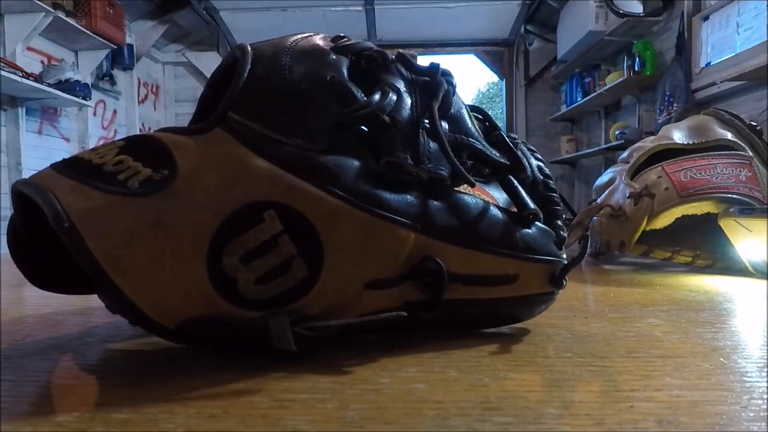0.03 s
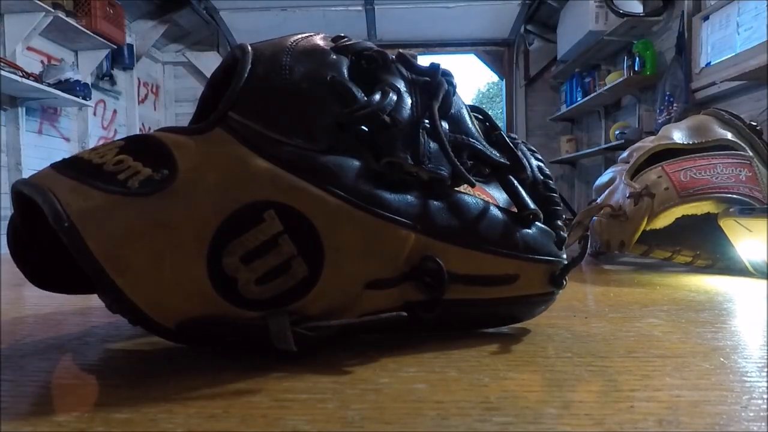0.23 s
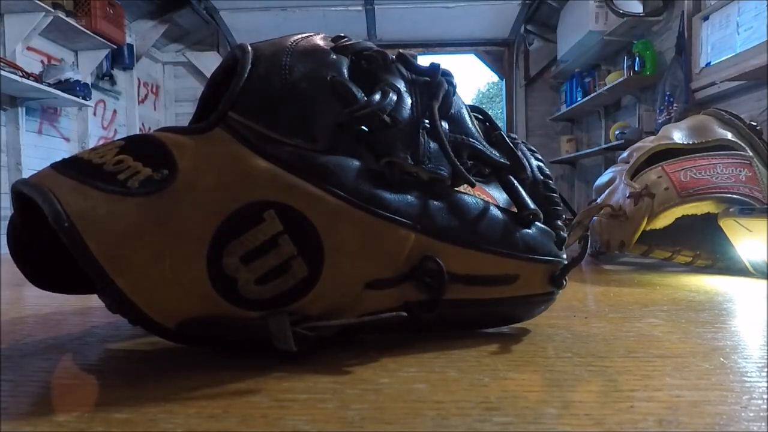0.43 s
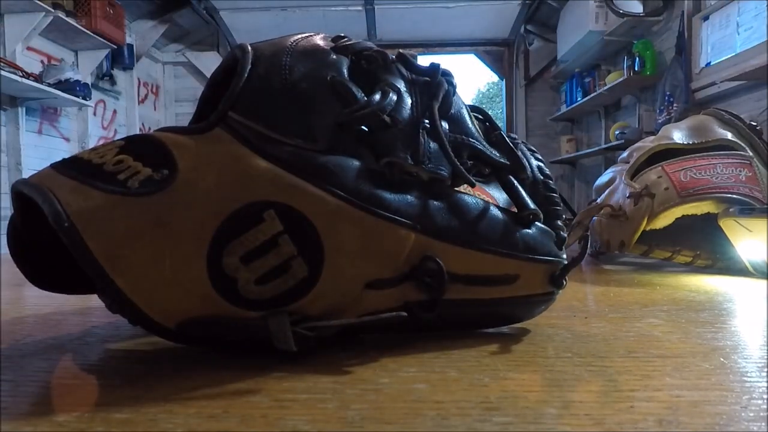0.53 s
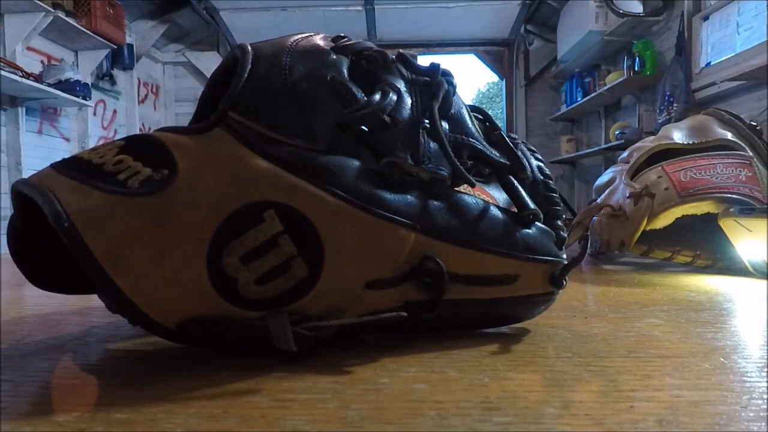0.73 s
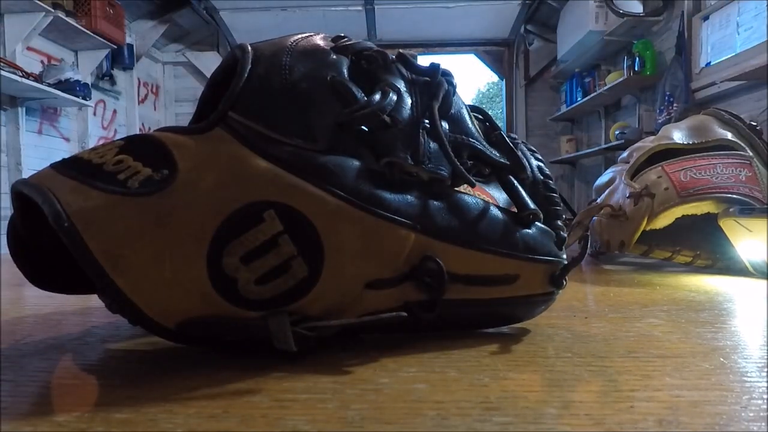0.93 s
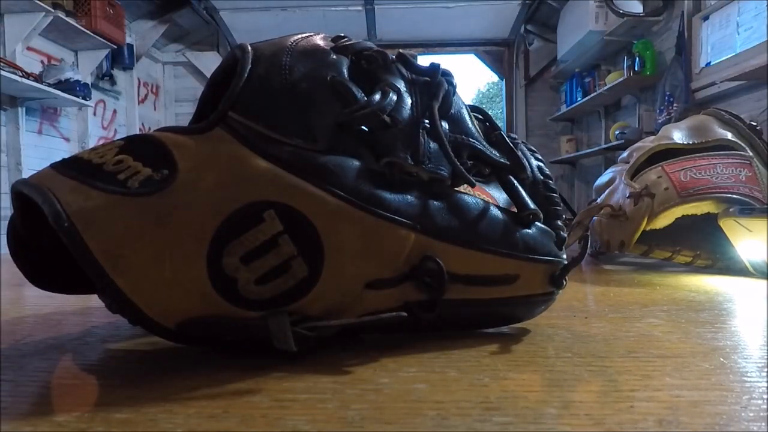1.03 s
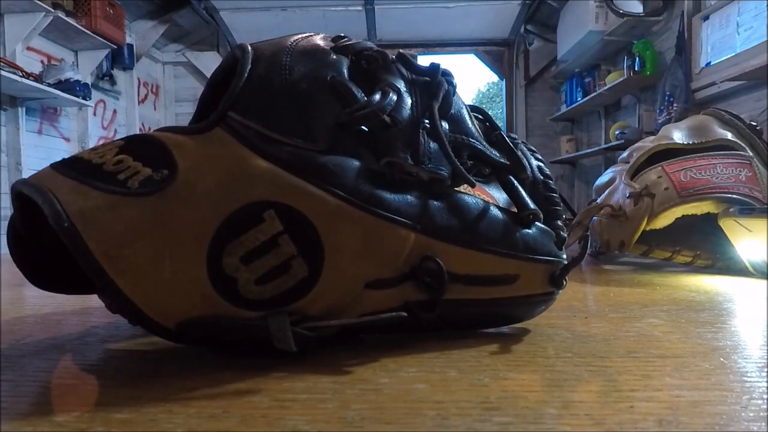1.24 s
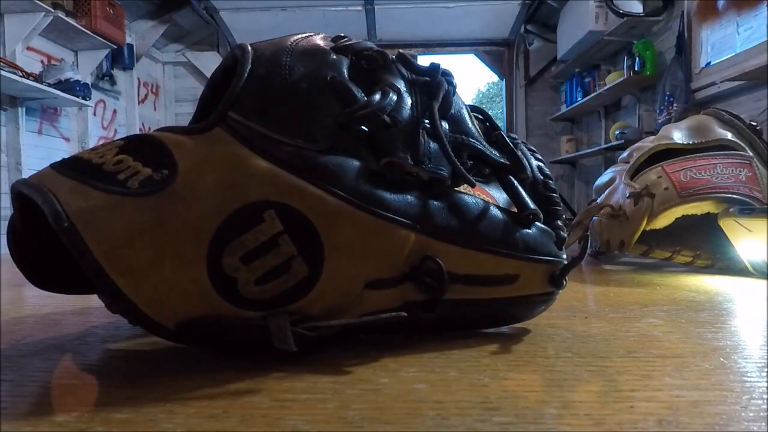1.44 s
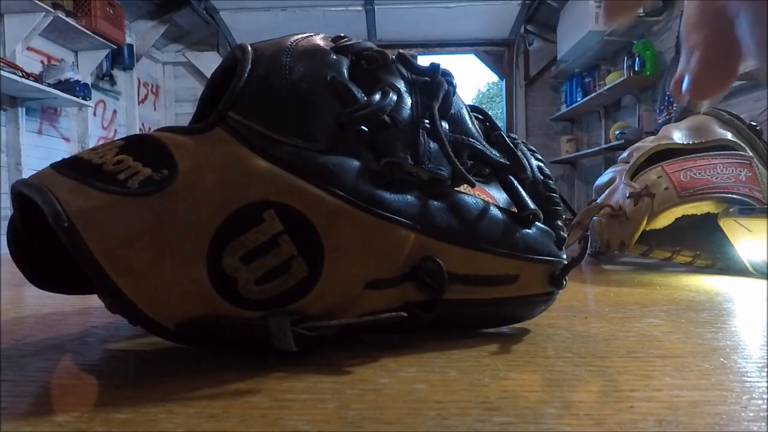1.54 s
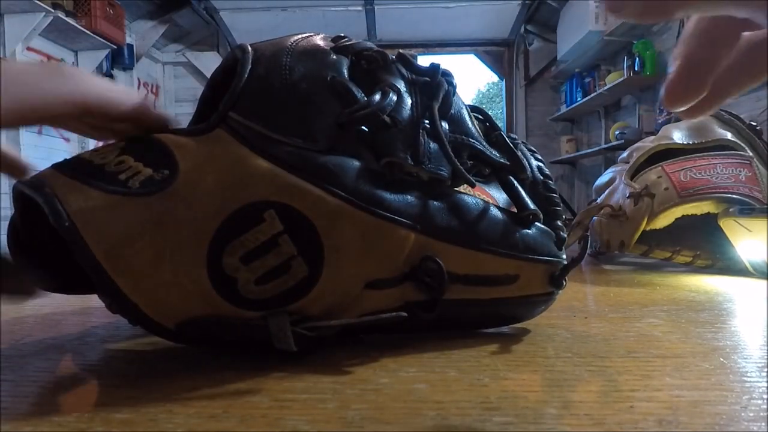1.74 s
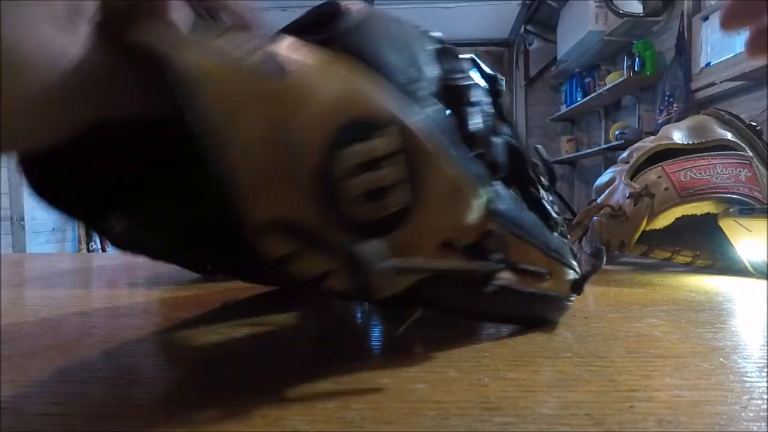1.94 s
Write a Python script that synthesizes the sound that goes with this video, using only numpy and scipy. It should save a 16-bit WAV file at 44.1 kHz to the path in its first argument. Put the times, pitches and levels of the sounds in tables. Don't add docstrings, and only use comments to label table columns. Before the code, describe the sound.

A leather glove thumps on a wooden table, heard close in stereo. From 0.06 to 0.3 seconds uneven knocks make the wood ring low, with cloth rustle and a deep wobble. Until 1.45, quiet swishes and tiny leather ticks sit over garage hiss and hum. At 1.46 a hard, short thump with a bounce ducks the noise; it recovers while faint finger taps sound from 1.7 to 2.

```python
import sys
import numpy as np
from scipy import signal
from scipy.fft import rfft, irfft
from scipy.io import wavfile
from scipy.ndimage import uniform_filter1d, minimum_filter1d

SR = 44100
rng = np.random.default_rng(int(sys.argv[2]) if len(sys.argv) > 2 else 0)


def unload_audio(sound):
    columns = np.transpose(np.atleast_2d(sound))
    steps = np.round(np.clip(columns, -1, 1) * 32767)
    wavfile.write(sys.argv[1], SR, steps.astype(np.int16))


def voltage_ratio(decibels):
    exponent = np.asarray(decibels, float) / 20
    return 10 ** exponent


N = 88200

# (frequency [Hz], level [dB per Hz])
NOISE_MIDDLE = [(30, -33), (105, -56), (150, -6), (380, -15), (1000, -22.5), (3500, -32), (9500, -35),
                (15200, -48)]
# (frequency [Hz], level [dB per Hz])
NOISE_SIDE = [(40, -29), (105, -31), (150, 0.5), (400, -7), (650, -1), (4000, -29), (9500, -26.5),
              (15200, -43)]
# (frequency [Hz], width [Hz], level [dB], left over right [dB])
HUMS = [
    (78.7, 19, -65.5, 1),
    (147.2, 12, -67.5, 10),
    (204, 35, -75.5, 37),
    (5380, 140, -83, 26.5),
]
# (time [s], middle level [dB], side level [dB])
AUTO_GAIN = [
    (0, -1.5, 5),
    (1.465, -2.5, 4.5),
    (1.48, -39, -18),
    (1.53, -16, -3.5),
    (1.62, -6.5, 1),
    (1.719, -8.5, -6.5),
    (1.85, -5, -3),
    (2, -3.5, -12),
]
# (time [s], level [dB])
STAND_SHOVES = [(.0, -43.5), (0.094, -31), (.19, -59), (0.3, -38), (0.38, -36.5), (0.498, -53),
                (0.597, -49), (0.761, -61), (1.46, -58), (1.59, -53.5), (1.84, -56)]
# (loudest time [s], level [dB], rise [s], fall [s], centre frequency [Hz])
RUSTLES = [(.8, -60, .1, 0.11, 79), (1.605, -47, 0.021, .02, 50), (1.86, -55, .03, .06, 66),
           (1.66, -48.5, 0.019, .03, 233), (.01, -54, .02, 0.019, 214), (.03, -51.5, 0.032, 0.12, 81),
           (.60, -61, 0.028, .03, 6000), (.79, -60, 0.018, 0.024, 6230), (0.836, -54.5, 0.025, 0.036, 5400),
           (1.05, -50.5, 0.014, 0.027, 5500), (1.114, -51.5, 0.0027, 0.022, 5430),
           (1.40, -63, 0.033, 0.07, 2470)]
# (time [s], level [dB], centre frequency [Hz], length [s], left over right [dB])
TICKS = [(0.116, -53, 900, 0.02, 0), (0.15, -50, 1000, 0.03, 1), (0.189, -45.5, 1100, 0.015, 4),
         (.193, -46, 2060, 0.0046, 8), (.194, -51, 6000, 0.0035, 1), (.251, -55, 1800, .004, 3),
         (.285, -56, 1900, .005, 3), (0.388, -52, 6170, 0.0018, -3), (0.553, -47, 4940, 0.0015, 9),
         (.5532, -53, 7500, .001, 9), (.5617, -43, 7400, 0.001, 12), (0.5625, -47, 4900, 0.002, 9),
         (1.328, -59, 5400, .02, 4), (1.4643, -22, 1400, 0.0035, 1), (1.4646, -23, 2200, .002, 0),
         (1.465, -27, 3200, .002, 0.5), (1.4656, -39, 5200, .002, 6), (1.471, -43, 1574, 0.063, 7),
         (1.494, -35, 1250, 0.003, 3.5), (1.495, -47, 2530, 0.0042, -6), (1.603, -59, 3200, 0.0021, -7),
         (1.767, -53, 1110, 0.018, 9), (1.822, -54.5, 1610, 0.031, 4), (1.846, -48, 3700, 0.003, 1),
         (1.847, -53, 5500, .002, 1), (1.904, -58, 1780, 0.0055, 2), (1.939, -52, 2440, 0.001, -2),
         (1.993, -52, 4540, 0.0039, 0), (1.994, -47, 8000, 0.0027, 0)]
# (time [s], level [dB], frequency [Hz], time to fall 60 dB [s])
KNOCKS = [(.09, -36, 125, .12), (.113, -32, 700, .01), (.149, -12, 220, .02), (.1505, -10, 480, .012),
          (.160, -22, 930, .04), (.166, -14, 500, .012), (.1945, -4, 200, .03), (.195, -20, 950, .012),
          (.2, -23, 112, .22), (.246, -25, 112, .2), (.257, -24, 450, .015), (1.4648, -9, 1050, .008),
          (1.4655, -6, 640, .01), (1.4658, -7, 240, .025), (1.4664, -1, 500, .014), (1.4955, -8, 200, .04),
          (1.498, -20, 1000, .012)]
# (frequency [Hz], time to fall 60 dB [s],
#                        level when pressed [dB], when dropped [dB], under fingers [dB])
TABLE_MODES = [(61.2, 0.46, -21, -42, -19), (152.5, 0.27, -2.5, -2.5, 2.5), (179.9, 0.14, -1, 5.5, 4),
               (237.5, 0.23, -13.5, -0.5, -0.5), (287, 0.06, -4.5, 0, 7), (336.4, 0.076, 1, -2.5, 0),
               (396, 0.049, -30.5, -10.5, 6.5), (451.6, 0.096, 0, 5.5, 2), (504, 0.11, 4, 4.5, -4.5),
               (589.6, 0.14, -1, -6, -1), (666.4, 0.046, -1, 4.5, 4), (800, 0.032, -7.5, -4.5, 10),
               (910, 0.058, -8.5, 0.5, -3), (979, 0.016, 3.5, 3, 14)]
PRESSED, DROPPED, TAPPED = 2, 3, 4
# (time [s], level [dB], hardness [Hz])
PRESS = [(.062, -33, 880), (.072, -70, 890), (.082, -30, 880), (.092, -53, 840), (.102, -27, 910),
         (.113, -25, 1210), (.125, -62, 910), (.137, -16, 700), (.142, -14.5, 700), (.149, -6, 704),
         (.160, -16, 700), (.168, -8.5, 700), (.191, -9.5, 890), (.1925, -4, 280), (.215, -8, 292),
         (.244, -13.5, 473), (.257, -17.5, 530), (.272, -19.5, 316), (.33, -39.5, 298)]
# (time [s], level [dB], hardness [Hz])
DROP = [(1.453, -23, 648), (1.4635, -3, 1500), (1.473, -18.5, 292), (1.487, -12.5, 700), (1.496, -9.5, 595),
        (1.512, -28, 406), (1.536, -17, 474), (1.572, -20, 339), (1.588, -29, 585), (1.604, -37.5, 546)]
# (time [s], level [dB], hardness [Hz])
FINGERS = [(1.70, -44.5, 248), (1.785, -41, 252), (1.797, -38.5, 216), (1.808, -37, 265),
           (1.820, -48.5, 990), (1.837, -41.5, 860), (1.858, -41.5, 390), (1.884, -61, 300),
           (1.906, -53, 910), (1.937, -45, 540), (1.955, -45.5, 510), (1.979, -52, 810), (1.992, -35, 497)]
# (frequency [Hz], left over right [dB], right ahead [radians])
OPENINGS = [(40, 1.5, .1), (110, 3, 1.6), (180, 8, 1.4), (240, 9, 1.0), (335, 12, .6), (395, 7.5, 3.1),
            (470, 7, 3.1), (570, .5, 2.9), (790, -8, 3.0), (1000, -2, 3.5)]

NOISE_MIDDLE_DB, NOISE_SIDE_DB = -51, -54
HISS_HZ, HISS_BACK_S = 8950, 0.044
MOTOR_HZ, MOTOR_DB, MOTOR_PAN_DB = 385, -65.5, 16
WOBBLE_HZ, WOBBLE_RING_S = 33.54, 0.61
RUSTLE_PAN_DB, RUSTLE_OCTAVES = 4, 0.66
KNOCK_LOW_HZ = 95
TABLE_LOW_HZ, STRIKE_SPREAD_DB = 112, 2.5
TRAVEL_S = 0.0012
PRESS_DB, DROP_DB, FINGERS_DB = -3.5, -4, -2
ROOM_DB, ROOM_RING_S, ROOM_LOW_HZ, ROOM_HIGH_HZ = -10.5, 0.23, 700, 3070
LIMIT, LIMIT_S, TOP_HZ = .96, .012, 16600


def time():
    return np.arange(N) / SR


def rms_one(x):
    return x / np.sqrt(np.mean(x ** 2) + 1e-20)


def pan(db):
    return voltage_ratio(np.array([[db / 2], [-db / 2]]))


def high_pass(x, order, hz):
    return signal.sosfilt(signal.butter(order, hz, "high", fs=SR, output="sos"), x)


def band(x, hz, octaves):
    edges = np.clip(hz * 2. ** np.array([-octaves, octaves]), 20, .45 * SR)
    return signal.sosfilt(signal.butter(2, edges, "band", fs=SR, output="sos"), x)


def ring(x, hz, ring_s):
    shrink = voltage_ratio(-60 / (ring_s * SR))
    turn = 2 * np.pi * hz / SR
    return signal.lfilter([0, np.sin(turn)], [1, -2 * shrink * np.cos(turn), shrink ** 2], x + 1e-18)


def soft_push(length):
    push = np.hanning(length)
    return push / push.sum()


def coloured(spectrum):
    hz, db = np.transpose(spectrum)
    f = np.maximum(np.fft.rfftfreq(N, 1 / SR), 1)
    gain = voltage_ratio(np.interp(np.log(f), np.log(hz), db))
    return rms_one(irfft(rfft(rng.standard_normal(N)) * gain, N))


def background():
    s, middle_db, side_db = np.transpose(AUTO_GAIN)
    middle = voltage_ratio(np.interp(time(), s, middle_db))
    side = voltage_ratio(np.interp(time(), s, side_db))
    noise = voltage_ratio(NOISE_MIDDLE_DB) * middle * coloured(NOISE_MIDDLE)
    noise = noise + voltage_ratio(NOISE_SIDE_DB) * side * coloured(NOISE_SIDE) * [[1], [-1]]
    since_thump = time() - AUTO_GAIN[1][0]
    missing = (since_thump > 0) * np.exp(-np.maximum(since_thump, 0) / HISS_BACK_S)
    noise = noise - missing * high_pass(noise, 4, HISS_HZ)
    hums = 0
    for hz, width, db, pan_db in HUMS:
        hum = ring(rng.standard_normal(N), hz, 2.8 / width)
        hums = hums + pan(pan_db) * voltage_ratio(db) * rms_one(hum)
    motor = pan(MOTOR_PAN_DB) * voltage_ratio(MOTOR_DB) * side * np.sin(2 * np.pi * MOTOR_HZ * time())
    return noise + np.sqrt(middle * side) * hums + motor


def stand_wobble():
    force = np.zeros(N)
    for s, db in STAND_SHOVES:
        force[int(s * SR)] = voltage_ratio(db)
    return ring(band(force, WOBBLE_HZ, 0.25), WOBBLE_HZ, WOBBLE_RING_S)


def rustles():
    out, t = 0, time()
    for s, db, rise, fall, hz in RUSTLES:
        shape = np.exp(-np.where(t < s, ((s - t) / rise) ** 2 / 2, (t - s) / fall))
        cloth = band(rng.standard_normal((2, N)), hz, RUSTLE_OCTAVES)
        out = out + voltage_ratio(db) * shape * rms_one(cloth)
    return pan(RUSTLE_PAN_DB) * out


def leather_ticks():
    out, t = 0, time()
    for s, db, hz, length, pan_db in TICKS:
        age = np.maximum(t - s, 0) / length
        shape = (1 - np.exp(-10 * age)) * np.exp(-age)
        noise = rng.standard_normal(N) + .5 * rng.standard_normal((2, N))
        out = out + pan(pan_db) * voltage_ratio(db) * shape * rms_one(band(noise, hz, 0.33))
    return out


def knocks():
    out = np.zeros(N)
    for s, db, hz, ring_s in KNOCKS:
        push, force = soft_push(int(SR / hz / 2) + 2), np.zeros(N)
        i = int(s * SR)
        force[i:i + len(push)] = voltage_ratio(db) * push
        out += high_pass(ring(force, hz, ring_s), 2, hz / 2)
    return high_pass(out, 4, KNOCK_LOW_HZ)


def table(contacts, level_column):
    out = np.zeros(N)
    spread_db = rng.normal(0, STRIKE_SPREAD_DB, (len(contacts), len(TABLE_MODES)))
    no_rumble = signal.cheby2(6, 36, TABLE_LOW_HZ, "high", fs=SR, output="sos")
    for k, mode in enumerate(TABLE_MODES):
        delay = TRAVEL_S * np.sqrt(1000 / mode[0])
        force = np.zeros(N + SR)
        for (s, db, hard_hz), chance_db in zip(contacts, spread_db[:, k]):
            push = soft_push(int(SR / max(hard_hz, 100)) + 2)
            i = int((s + delay) * SR)
            force[i:i + len(push)] += voltage_ratio(db + mode[level_column] + chance_db) * push
        heard = ring(force[:N], mode[0], mode[1])
        out += heard if k == 0 else signal.sosfilt(no_rumble, heard)
    return out


def openings(left):
    hz, pan_db, lead = np.transpose(OPENINGS)
    f = np.log(np.maximum(np.fft.rfftfreq(N, 1 / SR), 1))
    gain = voltage_ratio(-np.interp(f, np.log(hz), pan_db))
    turn = np.exp(1j * np.interp(f, np.log(hz), lead))
    return np.array([left, irfft(rfft(left) * gain * turn, N)])


def room(x):
    t = time()[:SR // 2]
    edges = signal.butter(2, [ROOM_LOW_HZ, ROOM_HIGH_HZ], "band", fs=SR, output="sos")
    tail = rng.standard_normal((2, len(t))) * voltage_ratio(-60 * t / ROOM_RING_S) * (t > .004)
    wet = signal.fftconvolve(signal.sosfilt(edges, x)[None], tail, axes=1)[:, :N]
    return voltage_ratio(ROOM_DB) * wet / np.sqrt(np.sum(tail[0] ** 2))


def scene():
    pressed = voltage_ratio(PRESS_DB) * table(PRESS, PRESSED)
    dropped = voltage_ratio(DROP_DB) * table(DROP, DROPPED)
    fingers = voltage_ratio(FINGERS_DB) * pan(1.0) * table(FINGERS, TAPPED)
    near = openings(pressed + dropped + knocks()) + fingers + leather_ticks()
    return near + room(near[0]) + rustles() + stand_wobble() + background()


def roll_off(x):
    return signal.sosfilt(signal.butter(12, 15510, fs=SR, output="sos"), x)


def record(dry):
    span = int(LIMIT_S * SR)
    peak = np.abs(dry).max(axis=0) + 1e-9
    gain = minimum_filter1d(np.minimum(1, LIMIT / peak), size=span)
    limited = dry * uniform_filter1d(gain, size=span)
    mix = signal.sosfilt(signal.cheby2(10, 60, TOP_HZ, fs=SR, output="sos"), limited)
    return roll_off(mix)


dry = scene()
out = record(dry)
unload_audio(out)
```